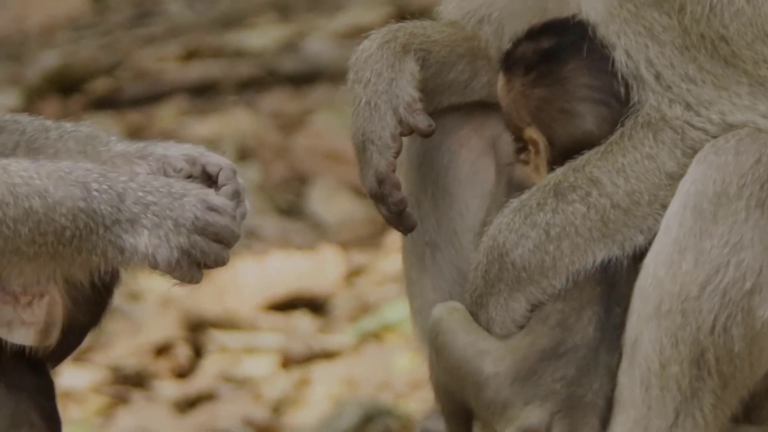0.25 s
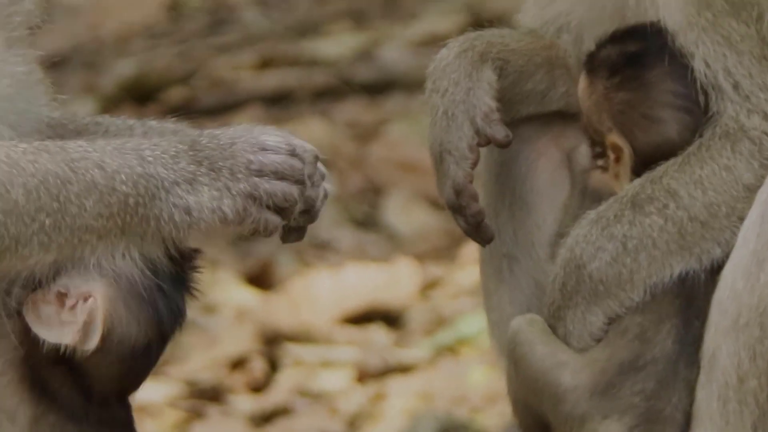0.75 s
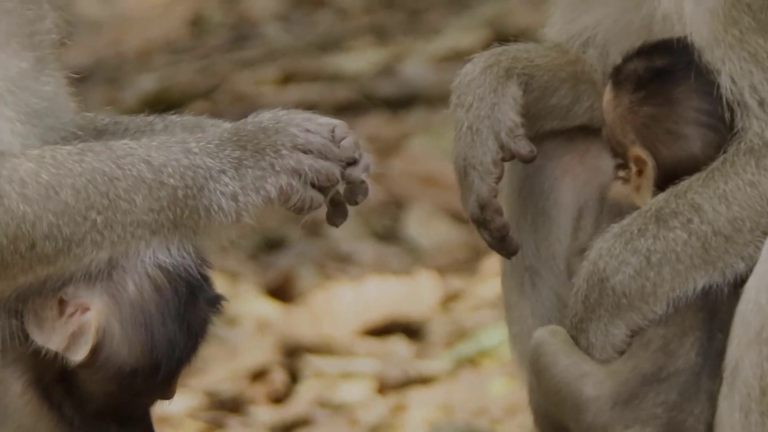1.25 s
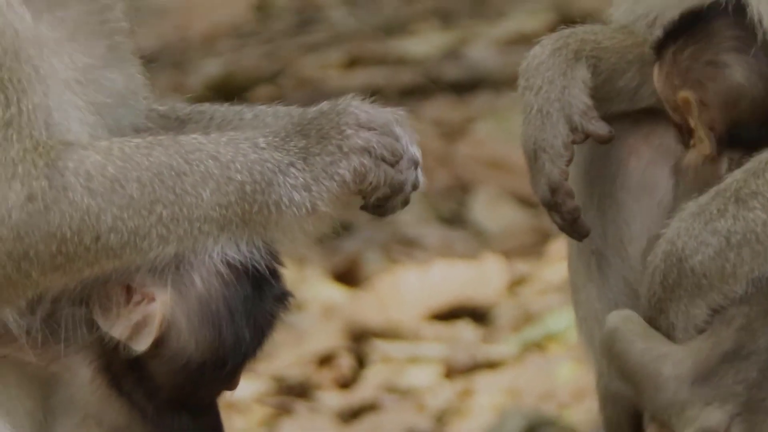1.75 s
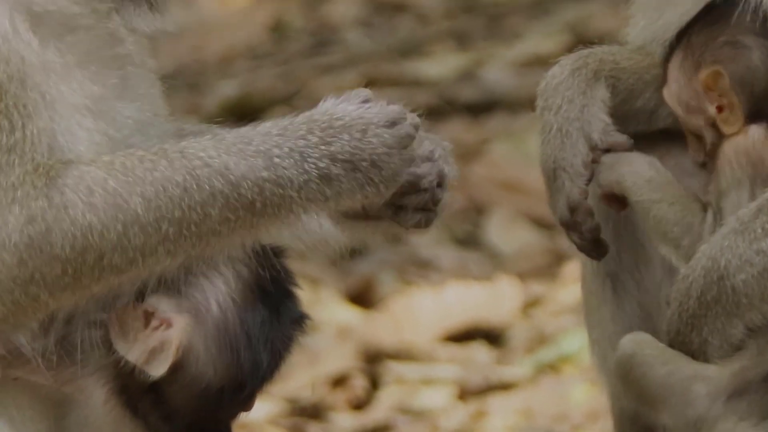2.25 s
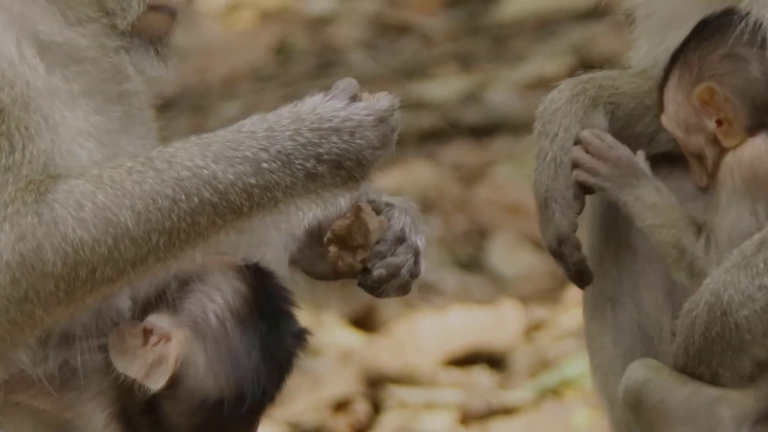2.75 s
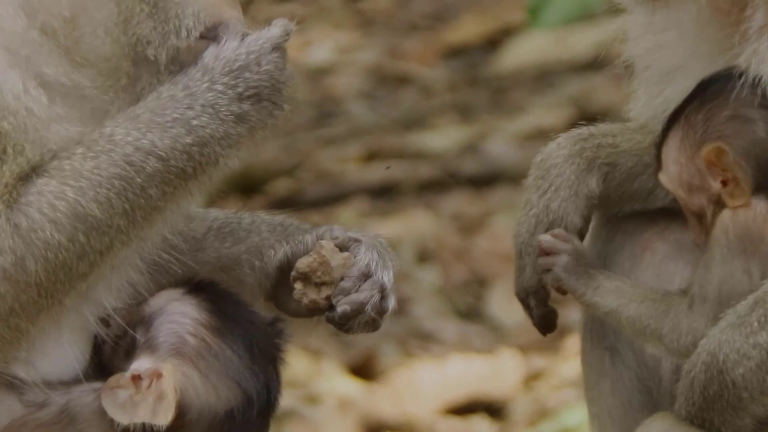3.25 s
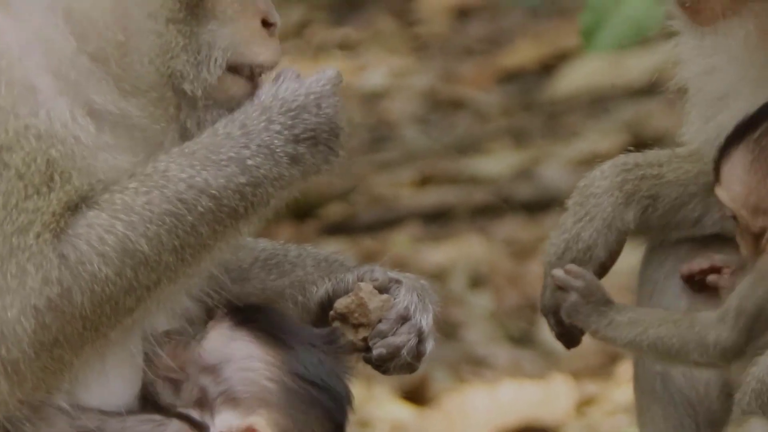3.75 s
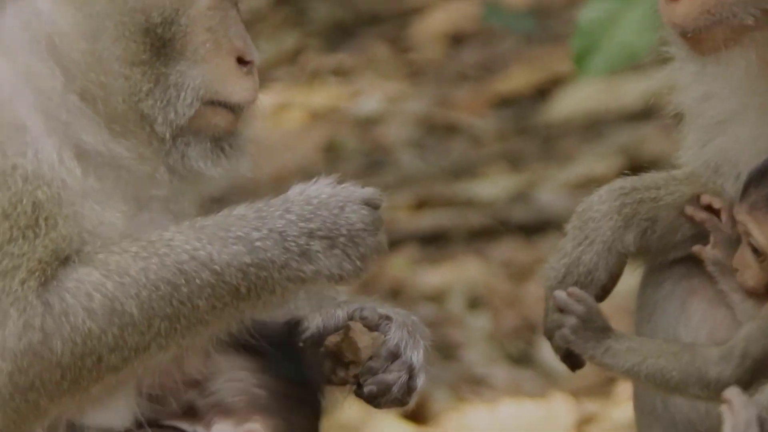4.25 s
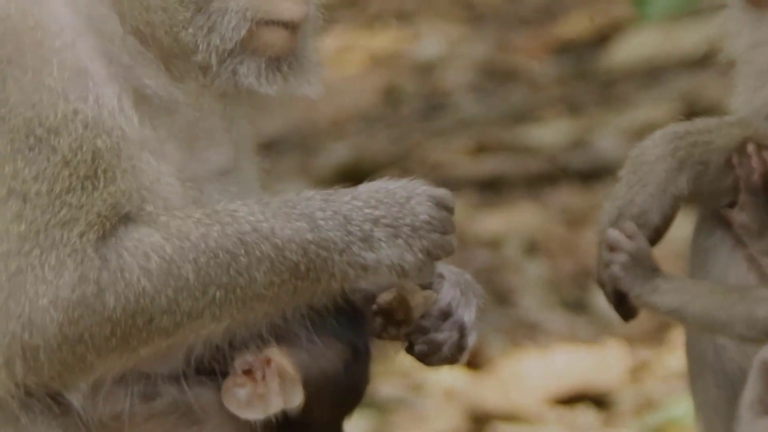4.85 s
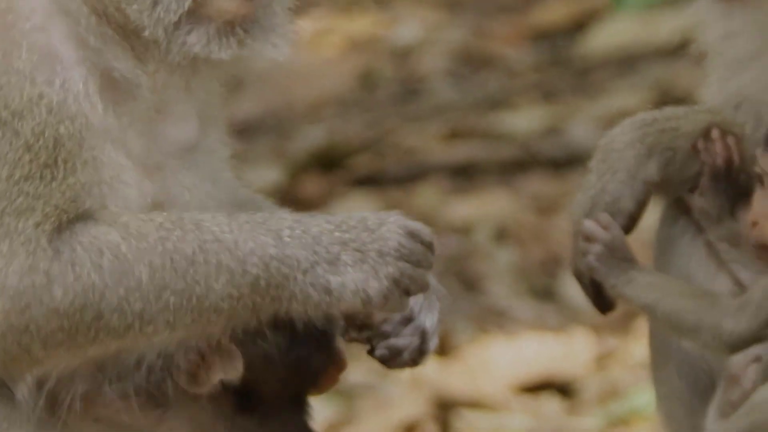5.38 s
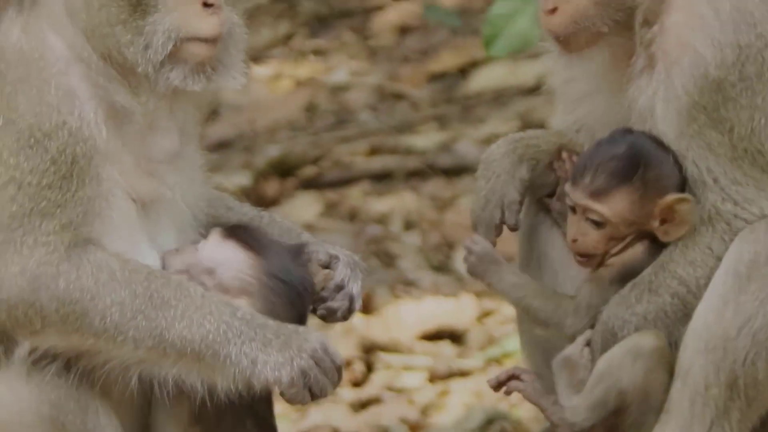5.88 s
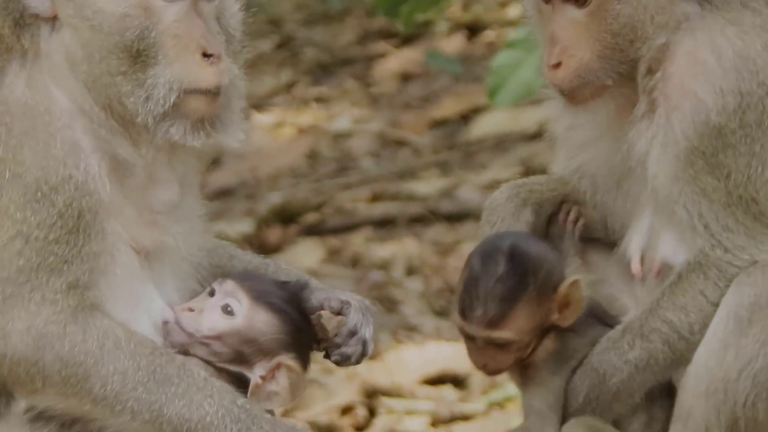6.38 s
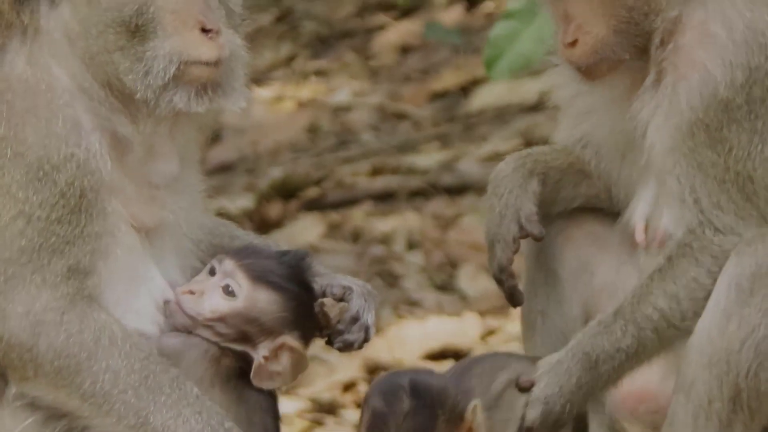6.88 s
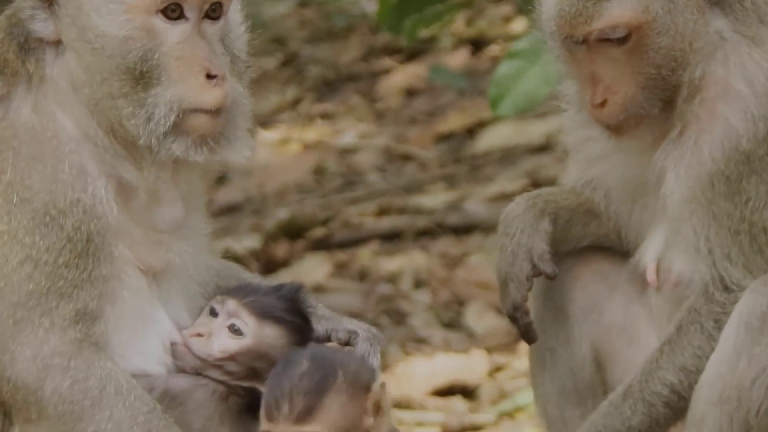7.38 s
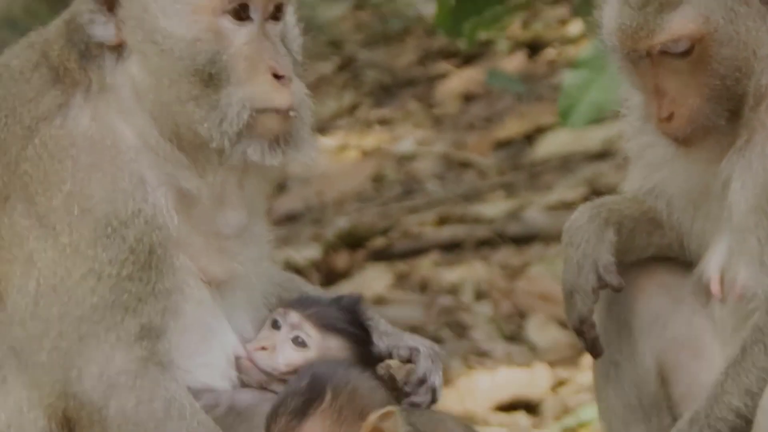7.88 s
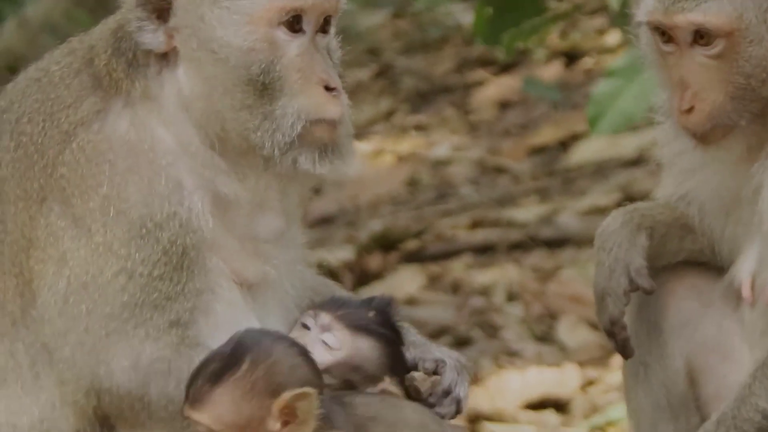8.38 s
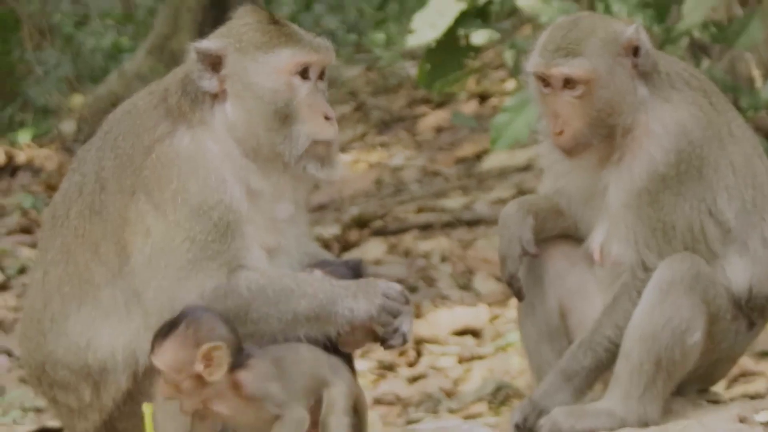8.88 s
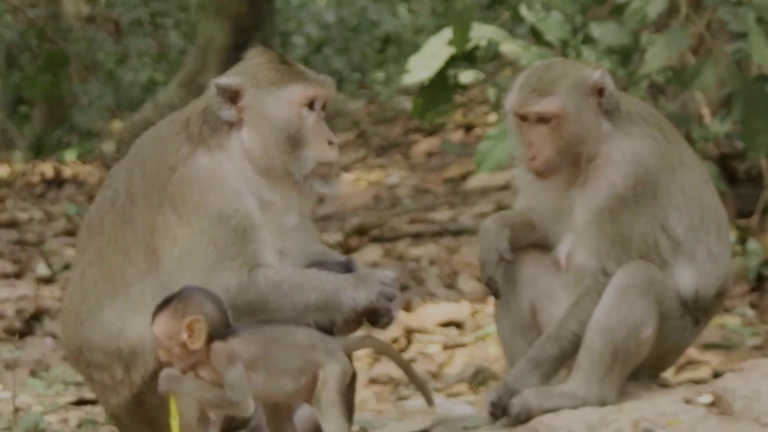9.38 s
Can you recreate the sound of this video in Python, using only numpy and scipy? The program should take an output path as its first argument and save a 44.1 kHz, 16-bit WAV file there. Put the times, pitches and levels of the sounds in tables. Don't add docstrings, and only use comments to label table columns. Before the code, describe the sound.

A forest bird gives a long falling whistle, then bouts of quick down-swept chirps echoing among trees over a high steady cicada drone.

```python
import sys
import numpy as np
from scipy import signal
from scipy.io import wavfile
from scipy.ndimage import uniform_filter1d

SR = 44100
rng = np.random.default_rng(int(sys.argv[2]) if len(sys.argv) > 2 else 0)


def transcribe(signal):
    frames = np.atleast_2d(signal).T
    limited = np.clip(frames, -1, 1)
    pcm = np.round(limited * 32767).astype(np.int16)
    wavfile.write(sys.argv[1], SR, pcm)


def amplitude_ratio(level_db):
    exponent = np.asarray(level_db, float) / 20
    return 10 ** exponent


N = 424683


def evened(x):
    return x / np.sqrt(np.mean(x ** 2) + 1e-20)


def read(points, hz):
    f, value = np.transpose(points)
    return np.interp(np.log(hz + 1), np.log(f + 1), value)


def over_time(rows):
    return np.interp(np.arange(N) / SR, *np.transpose(rows))


def add(mix, s, sound):
    part = mix[round(s * SR):][:len(sound)]
    part += sound[:len(part)]


def drift(count, top_hz):
    smooth = signal.butter(2, top_hz, fs=SR, output="sos")
    return evened(signal.sosfilt(smooth, rng.standard_normal(count)))


def resonate(x, hz, width):
    turn = np.exp(2j * np.pi * hz * np.arange(len(x)) / SR)
    r = np.exp(-np.pi * width / SR)
    return 2 * (turn * signal.lfilter([1 - r], [1, -r], x / turn)).real


def patchy(x, colour, patch_db, frames, bins, size):
    hz, _, z = signal.stft(x, SR, nperseg=size, noverlap=size * 3 // 4)
    patches = rng.standard_normal(z.T.shape).T
    patches = uniform_filter1d(patches, round(bins), 0)
    patches = evened(uniform_filter1d(patches, round(frames), 1))
    z = z * amplitude_ratio(read(colour, hz)[:, None] + patch_db * patches)
    return evened(signal.istft(z, nperseg=size, noverlap=size * 3 // 4)[1][:N])


def clicks(per_s, spread_db):
    size_db = spread_db * np.minimum(rng.exponential(1, N), 4)
    size = amplitude_ratio(size_db) * rng.choice([-1., 1.], N)
    return size * (rng.random(N) < per_s / SR)


def hush():
    # (pitch [Hz], level [dB per Hz])
    hush_colour = [(14, -40), (30, -12), (55, -2.5), (100, -0.5), (130, -3), (160, 0.5), (190, -4.5),
                   (400, -9), (800, -10), (1400, -13), (2200, -11), (8500, -32), (11500, -30), (15500, -28)]
    noise = rng.standard_normal(N)
    return amplitude_ratio(-40.5) * patchy(noise, hush_colour, 0.23, 4, 30, size=4096)


def cicadas():
    # (pitch [Hz], level [dB per Hz])
    drum_colour = [(1500, -54), (2100, -19), (2400, -17.5), (3000, -9.5), (3500, -2.5), (3900, -3),
                   (4350, -7), (4750, -17.5), (5350, -21), (5550, -26), (6450, -25.5), (6750, -28.5),
                   (7200, -29.5), (7600, -35), (10000, -45.5)]
    # (time [s], level [dB])
    chorus = [(0, -30.5), (2, -30.5), (4.5, -30), (7, -29.5), (9.63, -29.5)]
    drum = clicks(12000, 1.6) * amplitude_ratio(0.24 * drift(count=N, top_hz=22))
    return amplitude_ratio(over_time(chorus)) * patchy(drum, drum_colour, 0.49, 12, 10, size=1024)


def crickets():
    # (time [s], level [dB])
    cricket_level = [(0, -43.5), (1.5, -43.5), (3, -42), (4.5, -44), (6, -42), (7, -43.5), (8, -43.5),
                     (9.63, -42)]
    wings = clicks(2500, 1.24) * amplitude_ratio(0.77 * drift(count=N, top_hz=7.3))
    ring = resonate(resonate(wings, 1810, 160), 1625, 400)
    return amplitude_ratio(over_time(cricket_level)) * evened(ring)


def rustle(s, db, hz, half):
    t = np.arange(-2 * half, 2 * half, 1 / SR)
    noise = rng.standard_normal(len(t))
    crackle = resonate(resonate(noise, hz, 2200), hz, 2200)
    return s + t[0], amplitude_ratio(db) * evened(crackle) * np.exp(-(t / half) ** 2)


def forest(x, wet_db, ground_db, slope_db, reach):
    # (delay [s], level [dB])
    trunks = [(.0195, -14), (.033, -15)]
    # (pitch [Hz], time [s])
    dying = [(1500, 0.8), (2000, 0.8), (2500, 0.78), (3000, 0.82)]
    # (pitch [Hz], level [dB])
    scatter = [(1500, 1.5), (2000, 0.5), (2500, 5.5), (3000, -1)]
    ground_s, slope_s = .0056, .115

    path = np.zeros(SR // 4)
    for s, db in [(0, 0), (ground_s, ground_db), (slope_s, slope_db)] + list(trunks):
        add(path, s, amplitude_ratio(db) * np.ones(1))
    out = signal.oaconvolve(x, path)[:len(x)]

    at = np.arange(320, SR // 2 - 20, 20)
    turn = 2 * np.pi * 4.3 * np.arange(len(x)) / SR
    for k in range(3):
        taps = np.zeros(SR // 2)
        taps[at + rng.integers(0, 20, len(at))] = rng.choice([-1., 1.], len(at))
        hz, t, z = signal.stft(taps, SR, nperseg=256)
        quick = amplitude_ratio(8.5 - 60 * t / .1)
        slow = amplitude_ratio(-60 * t / reach / read(dying, hz)[:, None])
        z = z * amplitude_ratio(read(scatter, hz))[:, None] * (slow + quick)
        tail = signal.istft(z, SR, nperseg=256)[1]
        share = np.sqrt(2 / 3) * np.cos(turn + k * np.pi / 3)
        out += amplitude_ratio(wet_db) * signal.fftconvolve(x * share, tail / 25)[:len(x)]
    return out


def sing(hz, db, waver):
    hz = hz * (1 + waver * drift(count=len(hz), top_hz=59.6))
    edge = signal.windows.tukey(len(hz), 600 / len(hz))
    return np.sqrt(2) * amplitude_ratio(db) * edge * np.sin(2 * np.pi * np.cumsum(hz) / SR)


def whistle():
    # (time [s], pitch [Hz], level [dB])
    whistle_path = [
        (1.215, 3340, -38),
        (1.224, 3090, -15.5),
        (1.249, 2570, -21),
        (1.275, 2307, -19),
        (1.317, 2100, -12),
        (1.348, 2060, -16),
        (1.449, 2028, -15),
        (1.57, 2014, -18.5),
        (1.6, 1980, -37),
    ]
    s, hz, db = np.transpose(whistle_path)
    t = np.arange(s[0], s[-1], 1 / SR)
    glide = uniform_filter1d(np.interp(t, s, hz), size=600, mode="nearest")
    level_db = np.interp(t, s, db)
    tone = sing(glide, level_db + 2.2 * drift(count=len(t), top_hz=80), .002)
    grown_db = -14 * np.exp(-(t - s[0]) / 0.028)
    breath = sing(glide + 140, level_db - 9 + grown_db, 0) * drift(count=len(t), top_hz=110)
    return s[0], tone + breath


def chirp(s, db, fall, end_hz, note_db):
    # (pitch [Hz], level [dB])
    voice = [(1500, -4.5), (1750, -16.5), (2100, 2.5), (2400, 7), (2750, 11), (2950, 6.5), (3100, -40)]
    middle_hz, note_s = 2500, 0.054
    bend_hz = 125.4
    top_hz = voice[-1][0] + 26 * min(db + 25, 0)
    lead = (top_hz - middle_hz) / fall / 1000
    knee = (middle_hz - end_hz) / fall / 1000
    t = np.arange(-lead, knee + note_s, 1 / SR)
    hz = end_hz + bend_hz * np.logaddexp(0, 1000 * fall * (knee - t) / bend_hz)
    hz -= 450 * np.maximum(t - knee, 0)
    held = np.clip((t - knee) / 0.011, 0, 1)
    fade_db = -12 * (np.maximum(t - knee, 0) / note_s) ** 3
    return s - lead, sing(hz, db + read(voice, hz) + held * note_db + fade_db, 0.0085)


def scene():
    # (time [s], level [dB], centre pitch [Hz], half length [s])
    rustles = [
        (8.181, -31.5, 2000, .014),
    ]
    # (time of middle pitch [s], level [dB], fall [Hz per ms], end pitch [Hz], end note [dB])
    calls = [(1.504, -34.5, 21, 1525, 9), (1.93, -27.5, 21, 1564, 0.5), (2.328, -26, 21.67, 1534, 3.5),
             (2.724, -26, 18.5, 1534, 0), (3.12, -25, 19.7, 1537, 2.5), (3.521, -26.5, 20, 1530, 8),
             (3.924, -28, 21.5, 1503, 2.5), (7.818, -33, 32, 1532, 10.5), (8.255, -26.5, 24, 1510, 3.5),
             (8.652, -25, 19, 1546, 2), (9.040, -26.5, 21.8, 1510, -5), (9.435, -27, 22.4, 1540, -7)]
    insects = cicadas() + crickets()

    chirps, near = np.zeros((2, N))
    for row in rustles:
        add(near, *rustle(*row))
    s, held = whistle()
    held = np.r_[held, np.zeros(SR)]
    add(near, s, forest(amplitude_ratio(-8) * held, -4, -6, -13, .7))
    for row in calls:
        add(chirps, *chirp(*row))
    echoing = forest(amplitude_ratio(-7.5) * chirps, 0.053, 0.5, -21, 1.41)
    return (hush() + insects + near + echoing)[None]


def denoised(x):
    # (pitch [Hz], change [dB per dB of excess])
    depth = [(60, 0.16), (400, 0.63), (3500, 0.75), (7000, 0.92), (13000, 0.73)]
    hz, _, z = signal.stft(x, SR, nperseg=4096, noverlap=3072)
    power_db = 10 * np.log10(uniform_filter1d(abs(z) ** 2, size=3, axis=1) + 1e-20)
    usual_db = uniform_filter1d(np.median(power_db, 1), size=15)
    excess_db = np.clip(power_db - usual_db[:, None], -8, 6)
    z = z * amplitude_ratio(read(depth, hz)[:, None] * excess_db)
    return signal.istft(z, nperseg=4096, noverlap=3072)[1][:N]


def gate_db():
    # (time fully open [s], gain [dB], held open [s], held half open [s])
    openings = [(1.33, 3, 0.084, 0.18), (1.951, 7, 0.098, .001), (2.375, 7.5, .005, 0.024),
                (2.76, 8, 0.024, 0.0012), (3.163, 8, 0.029, 0.012), (3.542, 7.5, 0.068, 0.069),
                (3.976, 9.5, 0.013, 0.011), (7.877, 3.5, 0.034, 0.027), (8.296, 7.5, 0.047, 0.19),
                (8.714, 8.5, 0.024, 0.016), (9.075, 8, 0.035, 0.23), (9.47, 10, 0.033, .2)]
    open_s, close_db_per_s, half_open, shut_db = .095, 162, 0.53, -4
    t, gain_db = np.arange(N) / SR, np.zeros(N)
    for s, db, held, half in openings:
        drop_s = (1 - half_open) * db / close_db_per_s
        shut_s = half_open * db / close_db_per_s
        times = s + np.cumsum([-open_s, open_s, held, drop_s, half, shut_s])
        swing = db * np.array([0, 1, 1, half_open, half_open, 0])
        gain_db = np.maximum(gain_db, np.interp(t, times, swing))
    return shut_db + uniform_filter1d(gain_db, size=600)


def top_cut(x):
    return signal.sosfilt(signal.butter(12, 15640, fs=SR, output="sos"), x)


def record(dry):
    opened = denoised(dry[0]) * amplitude_ratio(gate_db())
    band = signal.firwin(1601, 15500, window=("kaiser", 9), fs=SR)
    limited = signal.oaconvolve(opened, band, "same")[None]
    return top_cut(limited - .0034)


dry = scene()
out = record(dry)
transcribe(out)
```